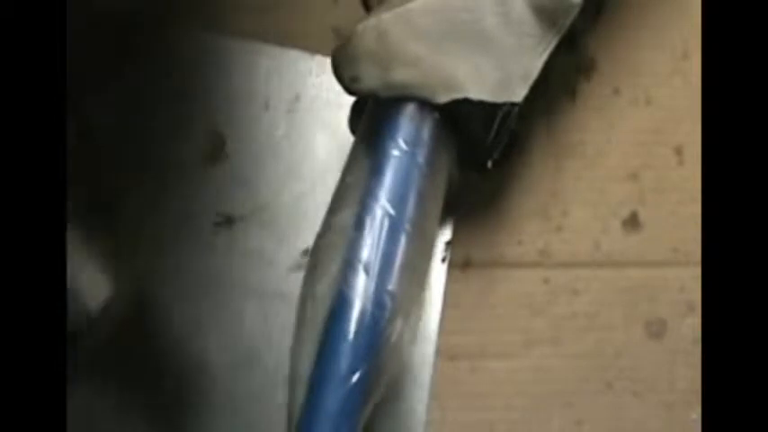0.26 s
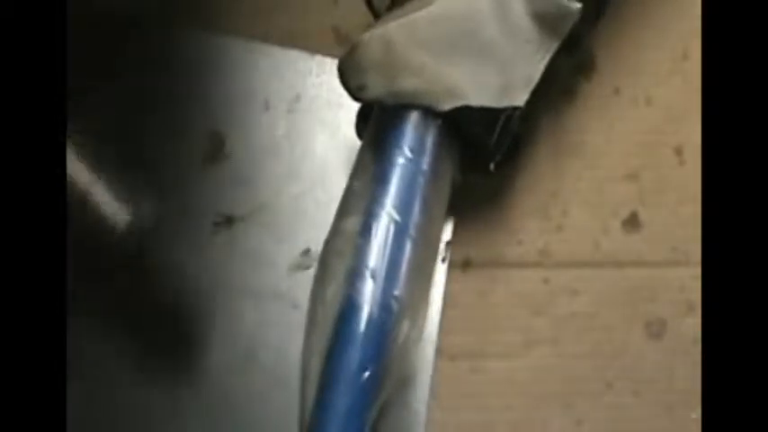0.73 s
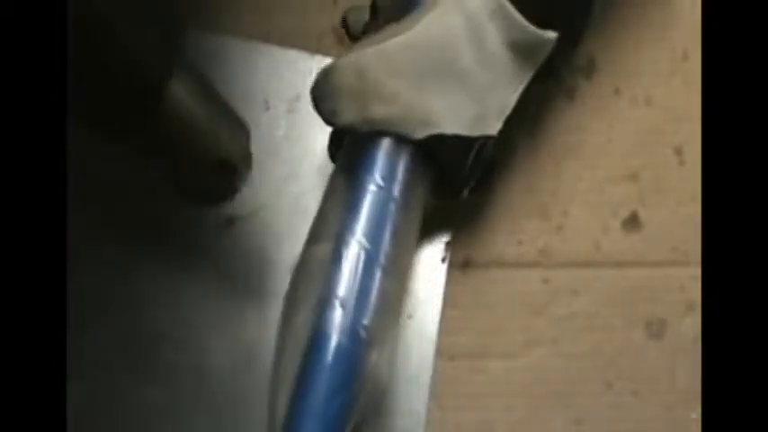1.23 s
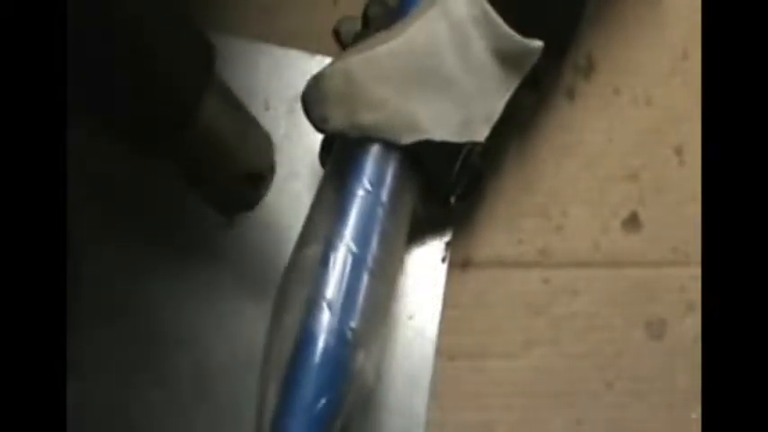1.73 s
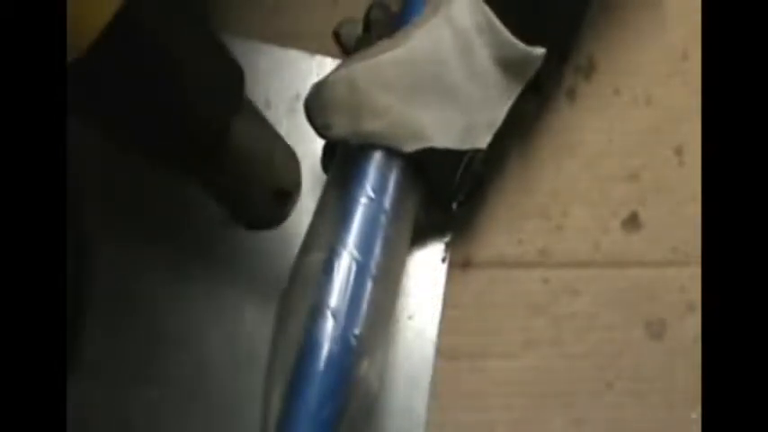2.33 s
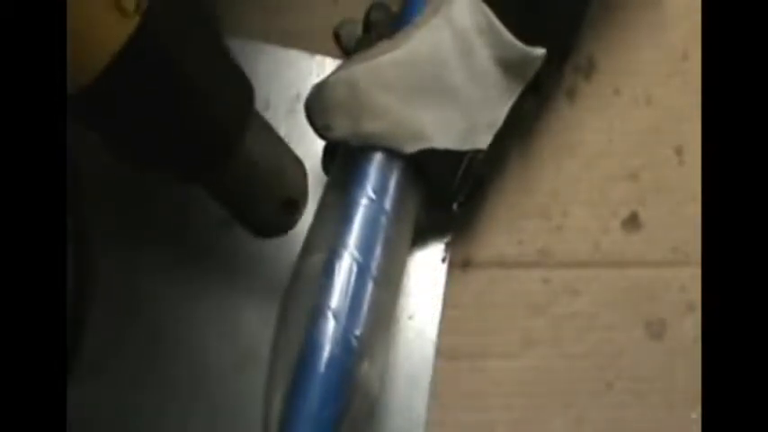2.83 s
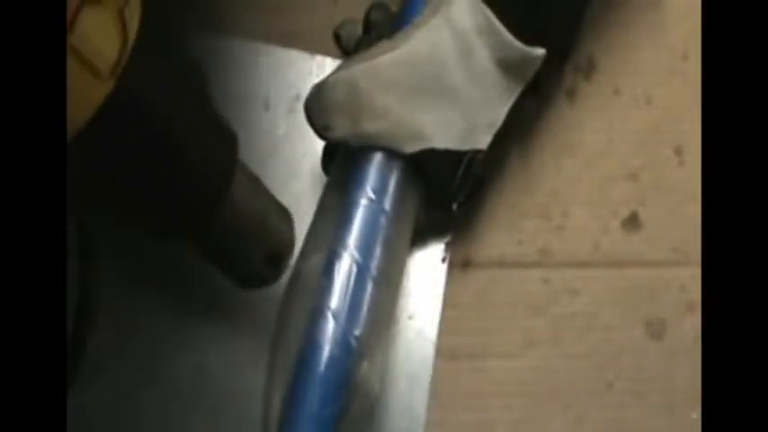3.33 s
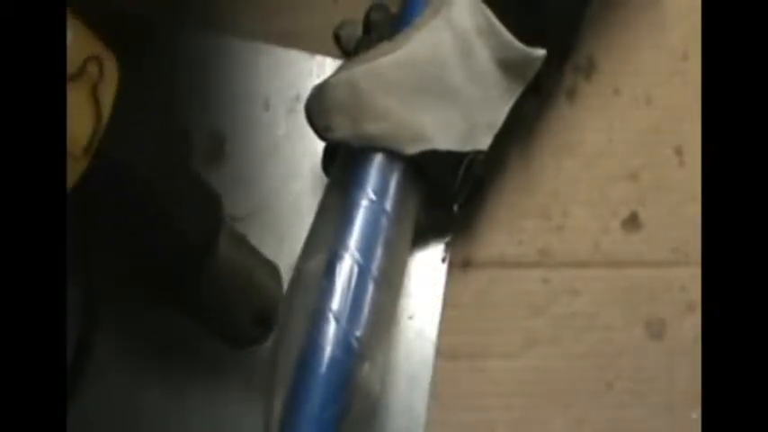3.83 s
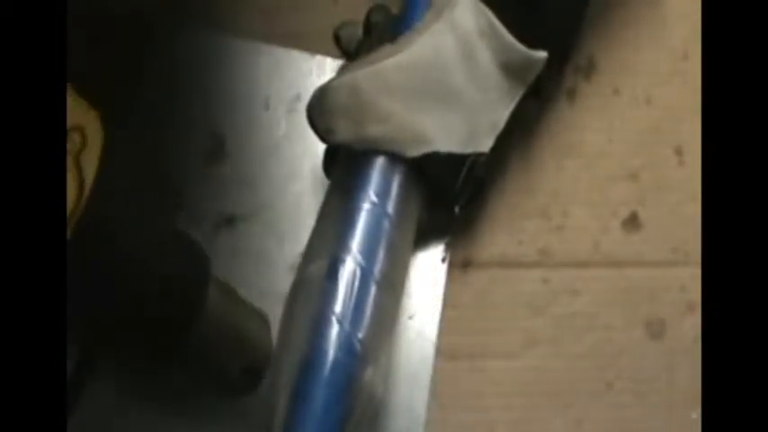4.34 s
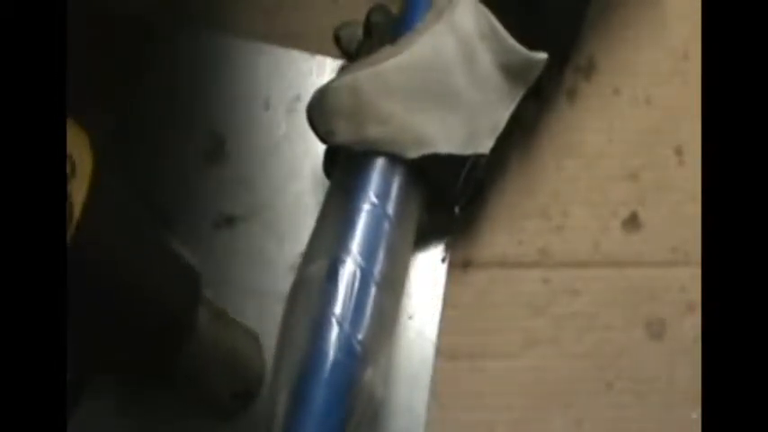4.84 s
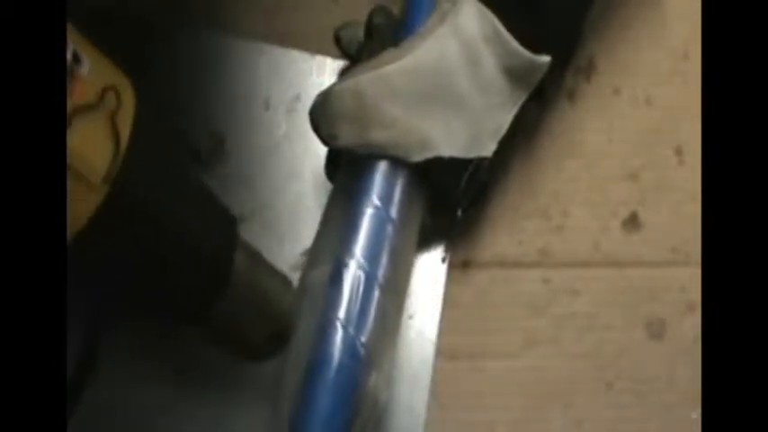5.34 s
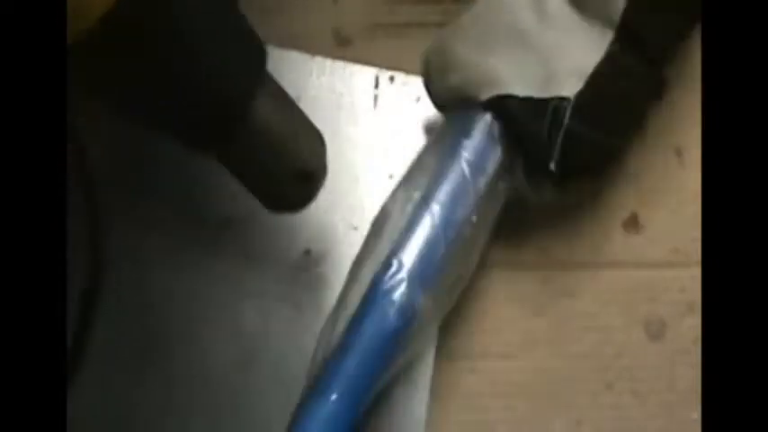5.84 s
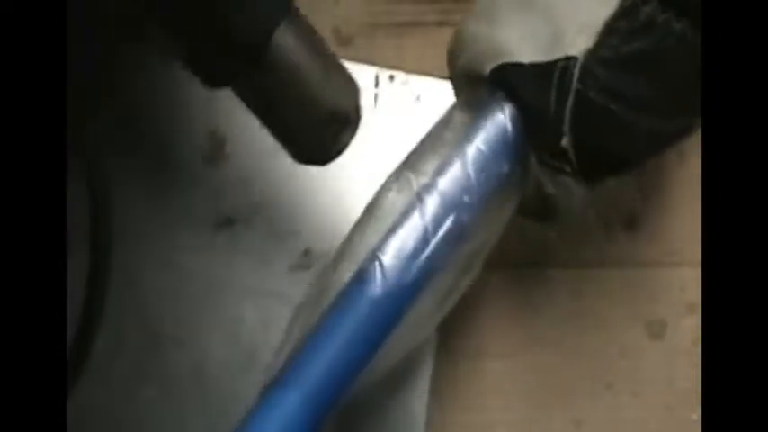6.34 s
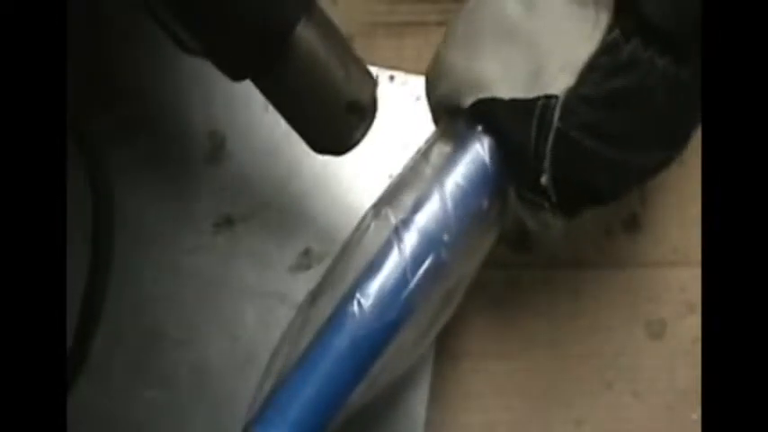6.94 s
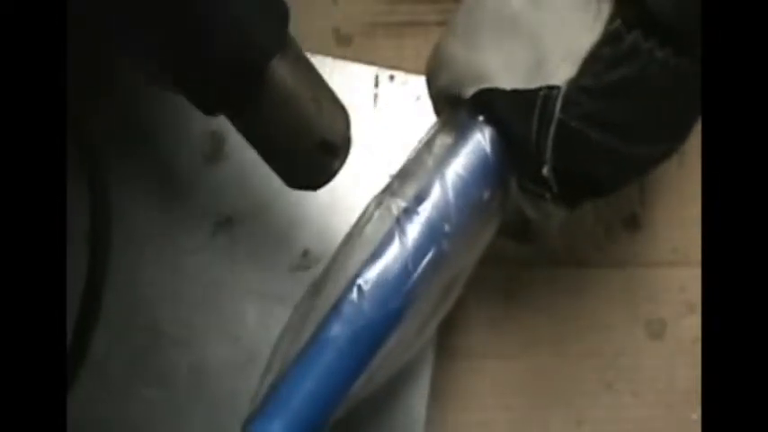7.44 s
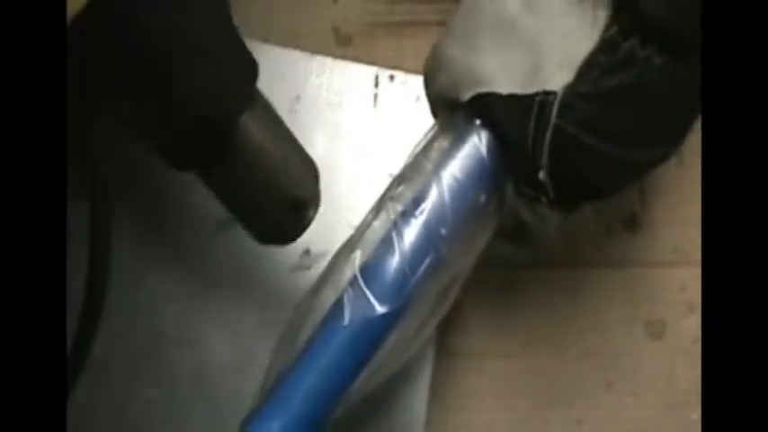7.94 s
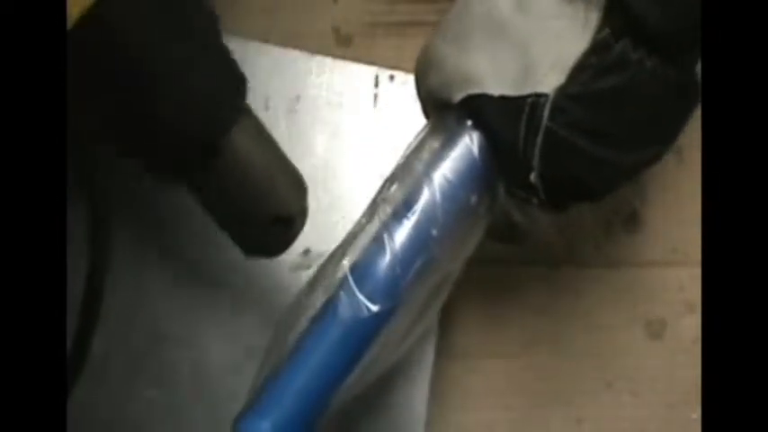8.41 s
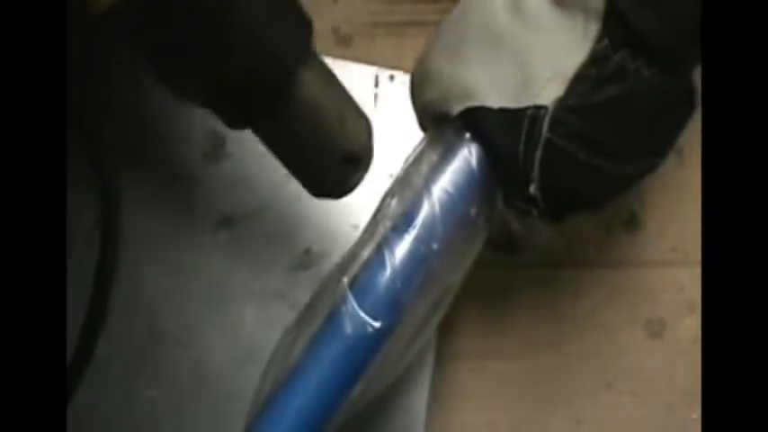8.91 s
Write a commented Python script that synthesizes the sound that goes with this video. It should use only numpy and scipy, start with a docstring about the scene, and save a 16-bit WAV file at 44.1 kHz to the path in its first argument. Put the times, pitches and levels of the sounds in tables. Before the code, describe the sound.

A heat gun's fan winds down amid small plastic clicks, then the switch snaps and the motor spins straight back up. It runs close by with a steady whine, rushing air, hiss and a fluttering rattle with brief faint whistles. Just past halfway everything abruptly shifts higher and faster. Low workshop machinery hums underneath, and a faint distant horn sounds twice in the second half.

```python
"""In a workshop, a heat gun's fan coasts down, the switch clicks and the motor spins it up again.
Five blades whine, air rushes through the barrel, the nozzle hisses and the shaft rattles.
Behind it machinery hums, and a far horn blows twice.
Just past halfway time runs fast, so every pitch and rhythm rises together."""
import sys
import numpy as np
from scipy import signal
from scipy.fft import rfft, irfft, next_fast_len
from scipy.io import wavfile
from scipy.ndimage import uniform_filter1d, map_coordinates

SR = 44100
rng = np.random.default_rng(int(sys.argv[2]) if len(sys.argv) > 2 else 0)


def unload_audio(sound):
    """Save the sound as a 16-bit wav file, at the path given as the first command line argument."""
    columns = np.transpose(np.atleast_2d(sound))
    # keep every value between -1 and 1, then stretch to whole-number steps
    steps = np.round(np.clip(columns, -1, 1) * 32767)
    wavfile.write(sys.argv[1], SR, steps.astype(np.int16))


N = 404397

# Sounds are built at normal pace; from FAST_FROM_S on, scene() multiplies pitches and rates by FAST_PACE.
FAST_FROM_S, FAST_PACE = 5.258, 1.696
WORK_SAMPLES = int(FAST_FROM_S * SR + (N - FAST_FROM_S * SR) * FAST_PACE) + 2
WORK_S = np.arange(WORK_SAMPLES) / SR
# when each sample is heard; the moments in all tables are on this clock
HEARD_S = np.minimum(WORK_S, FAST_FROM_S + (WORK_S - FAST_FROM_S) / FAST_PACE)
SWITCH_ON_S = .463


def amp(db):
    """Turn decibels into a factor to multiply a sound by."""
    return np.exp(np.asarray(db, dtype=np.float32) * np.float32(np.log(10) / 20))


def unit(x):
    """Scale x to an average (rms) strength of 1."""
    return x / np.sqrt(np.mean(x ** 2) + 1e-20)


def at_pitch(points, hz):
    """Read between (pitch_hz, value) points, with octaves evenly spaced."""
    pitches, values = np.transpose(points)
    return np.interp(np.log(hz + 1), np.log(pitches + 1), values)


def curves(rows):
    """Join rows of (time_s, values...) into one curve over time for each value."""
    times, *columns = np.transpose(rows)
    return [np.interp(HEARD_S, times, column) for column in columns]


def wobble(rate_hz):
    """A smooth curve through rate_hz random values a second."""
    coarse_s = WORK_S[::64]
    values = rng.standard_normal(int(WORK_S[-1] * rate_hz) + 4)
    return np.interp(WORK_S, coarse_s, map_coordinates(values, [coarse_s * rate_hz], mode="nearest"))


def swell(middle_s, half_length_s):
    """A bell-shaped rise to 1 and fall back to silence."""
    return np.exp(-((HEARD_S - middle_s) / half_length_s) ** 2)


def filtered(x, response):
    """Multiply each frequency in x by response(hz)."""
    size = next_fast_len(x.shape[-1] + 8192, True)
    hz = np.fft.rfftfreq(size, 1 / SR)
    gain = np.interp(hz, hz[::8], response(hz[::8])).astype(np.complex64)
    return irfft(rfft(x.astype(np.float32), size) * gain, size)[..., :x.shape[-1]]


def below(hz, edge_hz, order):
    """A gain that keeps what is below the edge; swap the first two arguments to keep what is above."""
    return 1 / np.sqrt(1 + ((hz + 1) / (edge_hz + 1)) ** (2 * order))


def noise(response):
    """Steady noise of strength 1, coloured by response(hz)."""
    return unit(filtered(rng.standard_normal(WORK_SAMPLES), response))


def workshop():
    """Machinery hums over low room noise, whose upper part grows with the gun's airflow."""
    # steady tones of the machinery: pitch_hz, relative_db
    hum_tones = [(25.4, -47), (34.2, -59), (42.6, -48), (51.3, -59.5), (60, -60), (69.7, -59),
                 (95.2, -46.5), (112.2, -53)]
    # how the whole hum rises and falls: time_s, relative_db
    hum_levels = [(0, 4), (.5, -13), (2, -6), (5, -1.5), (6, -2.5), (7, 4), (9.17, 5.5)]
    # colour of the room noise: pitch_hz, relative_db
    room_colour = [(12, -25), (22, -1), (64, -3), (110, 1), (150, -6), (195, -7), (238, -14), (295, -7),
                   (370, -3), (455, -12), (515, -16), (575, -4), (700, -12), (1300, -90)]
    hum_db, = curves(hum_levels)
    hum = sum(np.sqrt(2) * amp(db) * np.sin(2 * np.pi * hz * WORK_S + .5 * wobble(1.96))
              for hz, db in hum_tones)
    room = noise(lambda hz: amp(at_pitch(room_colour, hz)))
    rumble = filtered(room, lambda hz: below(hz, 200, order=3))
    air_db = airflow()[0]
    draught = (room - rumble) * amp(0.29 * (air_db - np.median(air_db)))
    return amp(hum_db - 2.4) * hum + amp(-40) * (rumble + draught)


def far_horn(rise_s=.08, fall_s=.092, swell_db_per_s=6.5, fading_db=3.5):
    """Two long blasts swell and sink; each tone fades and wavers on its way from far off."""
    # blasts of the horn: start_s, loudest_s, end_s, relative_db
    blasts = [(5.0, 6.08, 6.42, 4), (7.1, 7.9, 8.48, 2.5)]
    # tones of its chord: pitch_hz, relative_db
    tones = [(332, -44.5), (395, -45), (520.6, -38.5), (664, -38.5)]
    blowing = np.zeros(WORK_SAMPLES)
    for start_s, loudest_s, end_s, db in blasts:
        on = np.interp(HEARD_S, [start_s, start_s + rise_s, end_s - fall_s, end_s], [0, 1, 1, 0])
        blowing += on * amp(db - swell_db_per_s * np.abs(HEARD_S - loudest_s))
    chord = sum(amp(db + fading_db * wobble(5)) * np.sin(2 * np.pi * hz * WORK_S + .5 * wobble(14))
                for hz, db in tones)
    return blowing * chord


def handling_bump(time_s, half_length_s, level_db):
    """Handling makes one soft, very low thud."""
    thud = noise(lambda hz: below(hz, 50, order=7) * below(28, hz, order=4))
    return amp(level_db) * thud * swell(time_s, half_length_s)


def switch_scrape(early_s, half_length_s, level_db):
    """The switch scrapes along its slot just before it snaps shut."""
    scrape = noise(lambda hz: below(1800, hz, order=1))
    return amp(level_db + 2.5 * wobble(250)) * scrape * swell(SWITCH_ON_S - early_s, half_length_s)


def switch_clicks():
    """Each click is a short crack, the ring of the plastic housing and a hollow knock."""
    # clicks of the switch and housing: start_s, level_db, knock_db (relative to the click)
    clicks = [(0.1402, -23, 1), (0.2414, -26.5, -4), (0.361, -23, -29), (0.389, -31, -4.5),
              (0.451, -31, -26), (0.4627, -10, -16.5)]
    # tones at which the housing rings: pitch_hz, relative_db, fade_s (time to fall 60 dB)
    housing_tones = [(694, -2, 0.053), (1464, -8.5, 0.063), (2480, -2.5, 0.058), (3300, -5, 0.061),
                     (3920, 0, 0.047), (4060, 10, 0.021), (5550, -5, 0.025), (6000, -8, 0.037),
                     (8300, -13, 0.081), (9000, -16, 0.11), (9360, -9.5, 0.033), (9760, -2, 0.024)]
    out = np.zeros(WORK_SAMPLES)
    t = np.arange(SR // 8) / SR
    for start_s, level_db, knock_db in clicks:
        ring = sum(amp(db + rng.normal(0, 2) - 60 * t / fade_s) * np.sin(2 * np.pi * hz * t)
                   for hz, db, fade_s in housing_tones)
        crack = amp(-60 * t / 0.051) * rng.standard_normal(len(t))
        knock = amp(knock_db + 2.5 - 60 * t / 0.029) * np.sin(2 * np.pi * 790 * t)
        click = 1.17 * ring / np.abs(ring).max() + 0.56 * crack + knock
        out[round(start_s * SR):][:len(t)] += amp(level_db) * click
    return out


def housing_whistles(waver_hz):
    """The rattle catches one ring of the housing, which gives a brief, wavering whistle."""
    # the whistles: middle_s, half_length_s, pitch_hz, level_db
    whistles = [(0.686, 0.067, 3030, -30), (1.126, 0.051, 3560, -27), (2.27, 0.12, 3110, -31.5),
                (2.844, .09, 3130, -25), (4.418, 0.053, 3200, -24), (4.56, 0.061, 3750, -26),
                (5.07, 0.035, 3860, -30), (5.75, 0.062, 4160, -29), (8.14, 0.039, 2890, -26),
                (8.88, 0.088, 3920, -25.5)]
    waver = unit(wobble(waver_hz)) + 1j * unit(wobble(waver_hz))  # shakes both strength and pitch
    out = np.zeros(WORK_SAMPLES)
    for middle_s, half_length_s, hz, db in whistles:
        tone = np.real(waver * np.exp(2j * np.pi * hz * WORK_S))
        out += amp(db) * swell(middle_s, half_length_s) * tone
    return out


def speed_share(at_start=.92, coast_s=.37, spin_up_s=.134):
    """The shaft's share of full speed: it falls without power, then climbs toward 1 once switched on."""
    coasting = at_start * np.exp(-np.minimum(HEARD_S, SWITCH_ON_S) / coast_s)
    return 1 - (1 - coasting) * np.exp(-np.maximum(HEARD_S - SWITCH_ON_S, 0) / spin_up_s)


def speed_gain_db(db_per_doubling):
    """A slower shaft makes less sound: 0 dB at full speed, less below it."""
    return db_per_doubling * np.log2(speed_share())


def airflow():
    """Levels of air rush, rattle and hiss, which grow with speed, and the rattle's brightness, in dB."""
    # the flow at full speed as the gun is moved about:
    # time_s, air_db, rattle_db, brightness_db (the rattle's upper half minus its lower half)
    flow = [(0, -27.5, -25.5, -2), (.7, -28.5, -26.5, -4.5), (1.4, -25, -22.5, 3),
            (2.25, -25.5, -21.5, -2.5), (2.85, -25, -22, -2), (3.15, -25.5, -21.5, 2.5),
            (4.4, -24.1, -23, -2.3), (5.05, -24, -23.5, 0), (5.55, -25, -21.5, -2.5),
            (6.35, -27.7, -23, -2), (6.9, -26.5, -22, -5.5), (7.9, -26, -22.2, 3), (8.8, -26, -21, -0.7),
            (9.17, -26, -22, -6.5)]
    air_db, rattle_db, brightness_db = curves(flow)
    hiss_db = -28 + 0.28 * (rattle_db - rattle_db.mean())  # the hiss partly follows the rattle
    return (air_db + speed_gain_db(16), rattle_db + speed_gain_db(18.5),
            hiss_db + speed_gain_db(13.5), brightness_db + .4 * wobble(5))


def lulls(slight_per_s=1.3, slight_length_s=.018, slight_depth_db=4):
    """The sound dips when the shaft briefly runs smoothly; slighter dips also come by chance."""
    # the set dips: middle_s, length_s, depth_db (each noise of the gun takes only part of this depth)
    set_dips = [(1.187, 0.065, 6.5), (1.633, 0.072, 6.5), (1.713, 0.052, 7), (1.856, 0.13, 5.5),
                (2.03, 0.037, 8), (3.683, .055, 9.5), (4.64, .058, 1), (4.755, 0.063, 4), (5.676, .059, 2),
                (6.347, 0.067, 5), (6.592, .023, 10), (6.763, 0.03, 4.5), (6.824, .034, 9),
                (6.968, .052, 7), (7.59, .042, 8.5), (8.069, 0.023, 9.5), (8.73, 0.03, 6.5)]
    slight_times = SWITCH_ON_S + np.cumsum(rng.uniform(.2, 1.8, 40)) / slight_per_s
    slight_dips = [(time_s, slight_length_s, slight_depth_db) for time_s in slight_times]
    coarse_s = HEARD_S[::32]
    dips_db = np.zeros(len(coarse_s))
    for middle_s, length_s, depth_db in set_dips + slight_dips:
        distance = np.abs(2 * (coarse_s - middle_s) / length_s)
        dips_db += depth_db * np.exp(-np.minimum(distance, 4) ** 3)  # a flat-bottomed dip
    return np.interp(HEARD_S, coarse_s, dips_db)


def pose_shares():
    """How much each of the three ways of holding the gun counts at each moment."""
    # how the gun is held: time_s, pose (0 back, 1 low, 2 above)
    poses = [(0, 0.15), (2.95, 0.28), (3.35, 1), (5.6, 0.89), (5.85, 1.8), (9.17, 2)]
    pose, = curves(poses)
    return np.array([np.clip(1 - np.abs(pose - index), 0, 1) for index in range(3)])


def through_barrel(x, low_hz, high_hz):
    """One band of x, coloured by the barrel and by reflections off the bench."""
    # broad colour of the barrel: pitch_hz, relative_db
    barrel_colour = [(540.0, -11), (680.0, -6), (850.0, 2), (1250.0, -8.5), (1800.0, -5), (2350.0, -7.5),
                     (2700.0, -4.5), (4100.0, 0), (4550.0, -8.5), (5100.0, -17.5), (5700.0, -11),
                     (6300.0, -18.5), (7100.0, -8.5), (9200.0, -14.5)]
    # peaks and dips from the bench's reflections, in each pose: pitch_hz, width_hz, gain_db
    held_back = [(617, 37, -16.5), (950, 51, -8.5), (1014, 34, 3.5), (1500, 98, -2), (1740, 98, 6.5),
                 (2320, 90, -3), (3080, 81, 4), (3320, 45, -6), (3760, 45, 3.5), (3840, 20, -10),
                 (4400, 55, -2), (7000, 160, 0.5), (7750, 350, -6.5)]
    held_low = [(1210, 60, 3), (1776, 34, 9.5), (2000, 46, 8.5), (2496, 16, 8.5), (2714, 82, -7),
                (3750, 45, 3.5), (3156, 85, 6.5), (4390, 72, -5), (5190, 45, 8), (6640, 55, 1),
                (6900, 63, 6.5)]
    held_above = [(1070, 14, 6.5), (1780, 145, -5), (1770, 36, 7), (2406, 85, -6.5), (2541, 75, 5.5),
                  (2830, 140, 5), (3366, 136, -7.5), (3750, 50, 4), (4770, 260, 0.5), (7130, 200, -9),
                  (8600, 150, -7)]
    out = np.zeros(WORK_SAMPLES)
    for share, peaks in zip(pose_shares(), [held_back, held_low, held_above]):
        def colour(hz):
            bench_db = sum(db * np.exp(-((hz - pitch) / width) ** 2) for pitch, width, db in peaks)
            band = below(low_hz, hz, order=12) * below(hz, high_hz, order=12)
            return amp(at_pitch(barrel_colour, hz) + bench_db) * band
        out += share * unit(filtered(x, colour))
    return out


def turbulence(patchy_db):
    """Swirling air: noise with slowly drifting louder and softer patches of pitch."""
    spectrum = signal.stft(rng.standard_normal(WORK_SAMPLES, dtype=np.float32), nperseg=1024)[2]
    patches = uniform_filter1d(rng.standard_normal(spectrum.shape), size=3, axis=0)  # smooth over pitch
    patches = uniform_filter1d(patches, size=45, axis=1)  # smooth over time
    swirl = signal.istft(spectrum * amp(patchy_db * unit(patches)), nperseg=1024)[1]
    return unit(swirl[:WORK_SAMPLES])


def buzz(turns, repeat_share):
    """Swirling air mixed with a rough pattern that repeats with every turn of the shaft."""
    pattern = irfft(np.exp(2j * np.pi * rng.random(56)), 2048)
    repeating = unit(pattern[(turns % 1 * len(pattern)).astype(int)])
    return np.sqrt(repeat_share) * repeating + np.sqrt(1 - repeat_share) * turbulence(patchy_db=2.5)


def shaft_rattle(turns, brightness_db):
    """The shaft buzzes through the barrel; brightness tips the balance from its low half to its high."""
    rattle = through_barrel(buzz(turns, repeat_share=0.046), low_hz=2450, high_hz=4450)
    lower = filtered(rattle, lambda hz: below(hz, 3520, order=14))
    upper = rattle - lower
    return unit(lower * amp(-brightness_db / 2) + upper * amp(brightness_db / 2))


def fan_whine(angle, whine_db, unpowered_drop_db=4):
    """The fan sings at whole multiples of the shaft speed, loudest at the rate its five blades pass."""
    # tones of the fan in each pose: multiple (of the shaft speed), back_db, low_db, above_db
    fan_tones = [(1, -22, -23.5, -21.5), (4, -16.5, -17, -12.5), (5, -0.5, 0.5, 0.5), (6, -7, -18.5, -10.5),
                 (10, -5, -7.5, -6.5), (11, -15, -8.5, -15), (14, -9.5, -12.5, -13), (16, -15, -16, -12),
                 (17, -4, -9, -16), (19, -7, -7, -17), (20, -18, -13, -7.5), (21, -8, -9.5, -8),
                 (23, -9, -17, -11)]
    shares = pose_shares()
    whine = np.zeros(WORK_SAMPLES)
    for multiple, *pose_db in fan_tones:
        fading_db = (1.04 + 0.071 * multiple) * wobble(7)  # higher tones fade more as the gun moves
        whine += amp(np.dot(pose_db, shares) + fading_db) * np.sin(round(multiple) * angle)
    motor_db = speed_gain_db(26) - unpowered_drop_db * (HEARD_S < SWITCH_ON_S)
    return np.sqrt(2) * amp(whine_db + 0.5 + motor_db) * whine


def heat_gun(blades=5, mains_hz=60):
    """Fan whine, air rush, rattle and nozzle hiss, all tied to the turning shaft."""
    # the fan under power: time_s, full_speed_hz (shaft turns a second), whine_db (relative)
    fan = [(1.3, 179, -32.5), (1.8, 178.8, -36), (2.2, 179.8, -32), (2.9, 176.3, -34), (3.25, 179.2, -31),
           (4.5, 179.9, -31), (5, 178.4, -29), (5.27, 176.9, -31), (5.49, 180.1, -30), (5.81, 177.4, -33),
           (6, 179, -33), (6.75, 178.7, -33), (7.05, 179.5, -32.5), (7.35, 178.3, -31.5), (7.7, 179.9, -34),
           (8.1, 179.7, -32), (8.32, 177.9, -33), (8.6, 180.2, -32)]
    full_speed_hz, whine_db = curves(fan)
    air_db, rattle_db, hiss_db, brightness_db = airflow()
    speed_hz = full_speed_hz * speed_share() * (1 + .0008 * wobble(8) + .0012 * wobble(80))
    turns = np.cumsum(speed_hz) / SR
    angle = (2 * np.pi * (turns % 1)).astype(np.float32)
    lull_db, flutter = lulls(), wobble(45)
    whine = fan_whine(angle, whine_db)
    air = through_barrel(turbulence(patchy_db=1.34), low_hz=564, high_hz=2490)
    air *= amp(air_db - 0.19 * lull_db + 0.32 * flutter)
    rattle = shaft_rattle(turns, brightness_db)
    rattle *= amp(rattle_db - 0.74 * lull_db + 1.08 * flutter)
    hiss = through_barrel(buzz(turns, repeat_share=0.032), low_hz=4690, high_hz=10050)
    hiss *= amp(hiss_db - 0.3 * lull_db + .5 * flutter)
    # rattle and hiss pulse once a turn, as each blade passes, and with the motor's mains ripple
    turning_db = 0.53 * np.cos(angle) + 0.6 * np.cos(blades * angle) + 0.66 * np.cos((blades - 1) * angle)
    ripple_db = 0.4 * np.cos(2 * np.pi * mains_hz * WORK_S)
    pulse = unit(amp(turning_db + ripple_db))
    return whine + air + pulse * (rattle + hiss)


def microphone(x, echo_db, echo_fade_s=.25):
    """Sound reaches the left and right openings with different level, timing and room echo."""
    # how much louder the left is: pitch_hz, difference_db
    left_louder = [(60, -1), (110, -4), (200, -0.5), (380, -2), (700, 3), (1290, -0.5), (2380, 1.5),
                   (4400, -1), (8120, -1), (15000, 1.5)]
    # how far the left wave runs ahead: pitch_hz, lead_radians
    left_ahead = [(0, 0.8), (690, -0.54), (1210, -0.86), (1460, -0.1), (1810, -0.58), (2500, 1),
                  (3010, -0.47), (3620, -0.28), (7750, 0.49), (8870, 1), (9220, 0.0), (10900, 0.0),
                  (11700, -0.5), (15400, -0.2)]
    t = np.arange(SR // 3) / SR
    tails = rng.standard_normal((2, len(t))) * amp(-60 * t / echo_fade_s) * (t > .004)
    echo = signal.fftconvolve(x[None], tails / np.linalg.norm(tails[0]), axes=1)[:, :WORK_SAMPLES]
    echo = amp(echo_db) * filtered(echo, lambda hz: below(200, hz, order=2))

    def direct(side):
        return filtered(x, lambda hz: amp(side * at_pitch(left_louder, hz) / 2)
                        * np.exp(side * .5j * at_pitch(left_ahead, hz)))
    return np.array([direct(1), direct(-1)]) + echo


def scene():
    """The workshop in stereo, first at its own pace and then fast."""
    # the gun's sideways drift: time_s, difference_db (left minus right)
    drift = [(0, 2.7), (2, 0.5), (3, 1.5), (4.3, 1.9), (5, 2.2), (6, 1), (7, 1.1), (9.17, 1.5)]
    switch = switch_clicks() + switch_scrape(early_s=0.016, half_length_s=0.018, level_db=-30.5)
    switch = filtered(switch, lambda hz: below(560, hz, order=5))  # the small housing gives off no bass
    gun = heat_gun() + housing_whistles(waver_hz=90) + switch
    bump = handling_bump(time_s=4.9, half_length_s=0.057, level_db=-26)
    stereo = microphone(gun + bump + workshop() + far_horn(), echo_db=-13)
    drift_db, = curves(drift)
    stereo *= amp(np.array([drift_db, -drift_db]) / 2)
    stereo = filtered(stereo, lambda hz: hz < 10080)
    # reading through the samples in bigger steps makes time run fast
    position = np.interp(np.arange(N) / SR, HEARD_S, np.arange(WORK_SAMPLES))
    return np.array([map_coordinates(channel, [position]) for channel in stereo])


def record(dry):
    """Cut away the very highest treble."""
    top_hz, fade_width_hz = 15830, 120
    return filtered(dry, lambda hz: np.clip((top_hz - hz) / fade_width_hz, 0, 1))


dry = scene()
out = record(dry)
unload_audio(out)
```